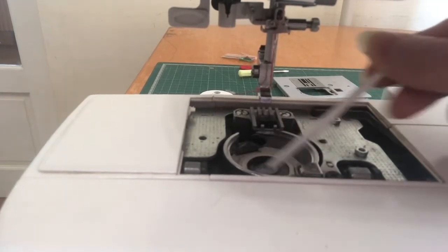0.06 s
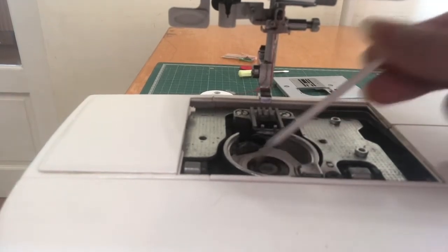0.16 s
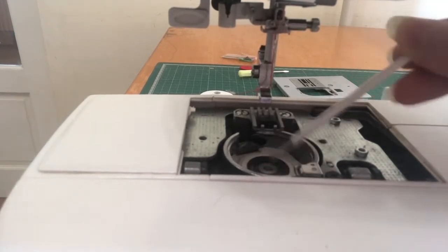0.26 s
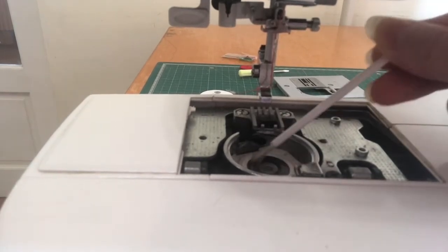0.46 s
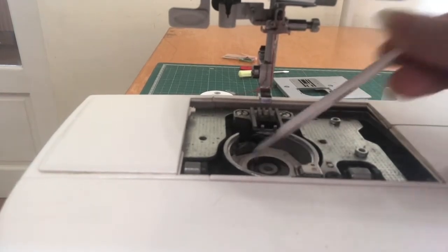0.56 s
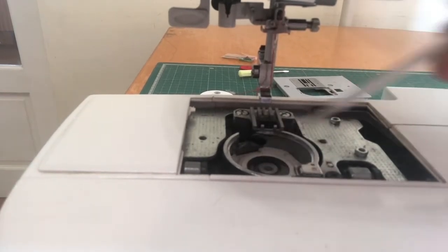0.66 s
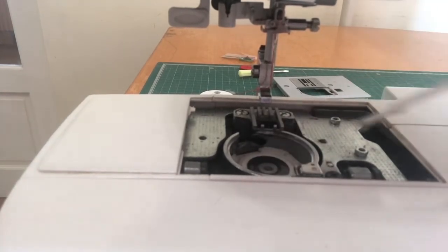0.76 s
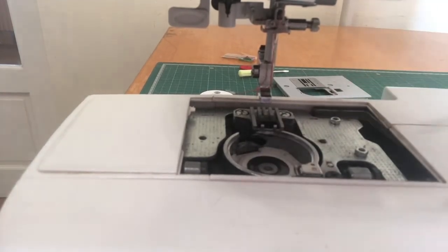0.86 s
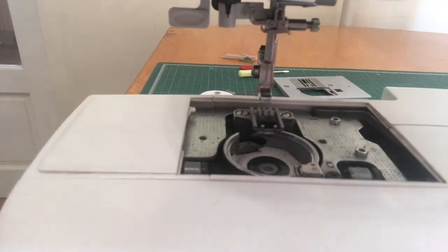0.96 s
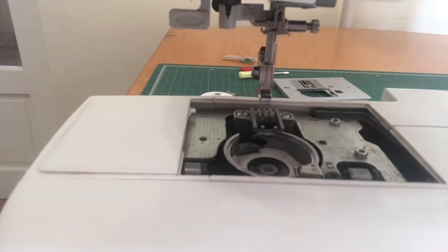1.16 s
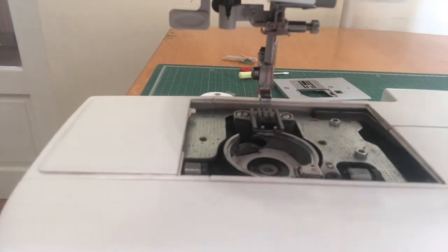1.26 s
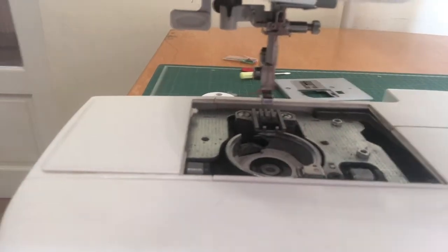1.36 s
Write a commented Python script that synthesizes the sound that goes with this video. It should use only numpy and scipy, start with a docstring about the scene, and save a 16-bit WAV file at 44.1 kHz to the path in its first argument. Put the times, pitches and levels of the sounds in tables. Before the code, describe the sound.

A stiff nylon brush scratches and flicks over metal inside a sewing machine, close by, with a low hollow rumble from the casing. At about 0.2 seconds the handle taps plastic and immediately hits metal harder, with a brief ring and hollow knock. Lighter scratching continues until 0.6 seconds. A few faint ticks follow until about 1.2 seconds over quiet room hiss.

```python
"""Brushing out a sewing machine

A stiff nylon brush works inside the open bed of a sewing machine in a quiet room, close to a phone.
Bristles drag and flick over the metal hook; the handle taps the plastic bobbin holder, then hits
the hook hard, and the hollow casing booms a little late. The brush leaves, with a few faint ticks
over the room hiss."""
import sys
import numpy as np
from scipy import signal
from scipy.fft import rfft, irfft
from scipy.io import wavfile

SR = 44100
rng = np.random.default_rng(int(sys.argv[2]) if len(sys.argv) > 2 else 0)


def inscribe(sig):
    """Save sig as 16-bit PCM at rate SR to the path in sys.argv[1].

    A 1-D sig is mono; a 2-D sig holds one channel per row.
    Samples are clipped to [-1, 1] before scaling.
    """
    pcm = np.round(np.clip(np.atleast_2d(sig).T, -1, 1) * 32767)
    wavfile.write(sys.argv[1], SR, pcm.astype(np.int16))


N = 61739


def undb(db):
    """Turn decibels into a number to multiply by."""
    return 10 ** (np.asarray(db) / 20)


def unit(x):
    """Scale a sound so that its average strength (rms) is 1."""
    return x / np.sqrt(np.mean(x ** 2))


def fade(t, fade_s):
    """Zero before t = 0, then a fade. A fade time is how long a drop of 60 dB takes."""
    return (t >= 0) * np.exp(-np.log(1000) * np.maximum(t, 0) / fade_s)


def click(at):
    """One sharp push at the given second."""
    return (np.arange(N) == int(at * SR)) * 1.


def band(x, hz, width):
    """Keep mostly the part of a sound around one pitch; the width is in Hz too."""
    return signal.lfilter(*signal.iirpeak(min(hz, .4 * SR), max(hz / width, .3), fs=SR), x)


def colour(x, points):
    """Make some pitches of a noise louder than others, along a curve of (Hz, dB) points."""
    hz, db = np.array(points).T
    freqs = np.arange(N // 2 + 1) * SR / N + 1
    curve_db = np.interp(np.log(freqs), np.log(hz), db)
    return irfft(rfft(x) * undb(curve_db), N)


def struck(tones, rise_cycles=4.3):
    """A small part after one click: each of its tones swells quickly, then fades."""
    t = np.arange(SR // 2) / SR
    out = 0
    for k, (hz, db, fade_s) in enumerate(tones):
        swell = np.clip(t * hz / rise_cycles, 0, 1)
        out += (-1) ** k * undb(db) * np.sin(2 * np.pi * hz * t) * swell * fade(t, fade_s)
    return out


def ring(force, response):
    """Every push in the force starts the response anew; plain noise comes out equally strong."""
    return signal.fftconvolve(force, response / np.sqrt(np.sum(response ** 2)))[:N]


def bristles(per_s, scatter_db, hardest_db=15):
    """Single bristles slip at random moments, some harder than the rest."""
    chance, direction, strength = rng.random((3, N))
    slips = chance < per_s / SR
    db = np.minimum(-scatter_db * np.log(1 - strength), hardest_db)
    return unit(slips * np.sign(direction - .5) * undb(db))


# The tone of the quiet room: (pitch [Hz], relative level [dB])
HISS_CURVE = [(15, -42), (25, -28.5), (60, -3), (142, 0), (238, -2.5), (304, -5.5), (651, -8.5),
              (1250, -13), (2900, -18.5), (4480, -17), (9580, -22.5), (15200, -26.5), (16500, -33.5)]


def room_hiss(level_db=-66.5):
    """A faint, steady hiss, strongest in the bass."""
    return undb(level_db) * unit(colour(rng.standard_normal(N), HISS_CURVE))


# The low tones of the hollow casing: (pitch [Hz], relative level [dB], fade time [s])
CASING_TONES = [(285, -21, 0.21), (366, 2, 0.071), (468, 4, 0.063), (583.6, -8.5, 0.11), (688.6, 2.5, 0.02),
                (771.5, -5.5, 0.047), (896, -22.5, 0.027), (1089, -23.5, 0.025)]


def casing(lag_cycles=0, fade_stretch=1, rise_cycles=2.5):
    """The casing after one push, one row per tone: each waits for its lag, swells and fades."""
    t = np.arange(SR // 2) / SR
    hz, db, fade_s = np.array(CASING_TONES).T[:, :, None]
    age = t - lag_cycles / hz
    swell = np.sin(np.pi / 2 * np.clip(age * hz / rise_cycles, 0, 1)) ** 2
    return undb(db) * swell * np.sin(2 * np.pi * hz * age) * fade(age, fade_s * fade_stretch)


# The tones of the metal hook: (pitch [Hz], relative level [dB], fade time [s])
HOOK_TONES = [(2273, -0.5, 0.024), (2633, -15, 0.055), (3028, -23, 0.079), (3470, -17.5, 0.081),
              (3832, -0.5, 0.052), (3805, -22.5, 0.28), (3882, -24, 0.34), (4390, -12.5, .035),
              (5560, -25, 0.027), (6000, 0, 0.019), (6310, -32, 0.23), (6340, -28.5, 0.29), (7294, -5, .04),
              (8130, -17, 0.05), (10020, 1.5, 0.028), (10430, -40, 0.14), (12300, -19, .025),
              (15000, -43, .2), (14960, -41, 0.213)]
# The tone of scratching nylon: (pitch [Hz], relative level [dB])
SCRATCH_CURVE = [(1200, 5.5), (2200, 13), (4000, 7), (6500, 9), (9000, -9), (12000, 0.5), (16000, -11)]
# How the dragging changes: (time [s], scratch level [dB], rumble level [dB],
# pitch the slipping locks on [Hz], lead of that pitch over distant tones [dB])
DRAG_PATH = [(0, -101, -79.5, 404, 1), (.047, -83, -75.5, 468, 0), (.057, -67.5, -55.5, 482, 12.5),
             (.08, -62.5, -50.5, 478, 15.5), (.105, -64, -50, 490, 20.5), (.115, -57.5, -50.5, 468, 7),
             (.13, -63.5, -55, 315, 12), (.163, -66, -52, 285, 13.5), (0.181, -83, -69, 285, 12),
             (0.216, -67, -70.5, 285, -1.5), (0.259, -47.5, -42.5, 366, 0.5), (.3, -58, -52, 366, 14.5),
             (.32, -54, -46.5, 366, 9.5), (.34, -61, -60, 366, 2), (.37, -65, -61, 366, 6.5),
             (.42, -64.5, -64, 366, 5.5), (.465, -68.5, -59, 285, 14.5), (.5, -72, -73.5, 468, 1.5),
             (0.533, -62.5, -57, 468, 11), (.545, -71, -62, 285, 6.5), (.568, -77, -56, 285, 15),
             (.59, -94, -72.5, 285, 5), (.69, -74, -80.5, 304, 3.5), (.73, -96, -78.5, 310, 3)]


def bristle_drag(t):
    """Pressed bristles scratch, ring the hook and rumble the casing, favouring one of its tones."""
    times, *columns = np.array(DRAG_PATH).T
    scratch_db, rumble_db, lock_hz, lead_db = (np.interp(t, times, column) for column in columns)
    slips = bristles(per_s=6000, scatter_db=2)
    scratch = undb(scratch_db) * unit(colour(slips, SCRATCH_CURVE))
    hook = undb(-19) * ring(undb(scratch_db) * slips, struck(HOOK_TONES))
    rumble = 0
    for (hz, _, _), tone in zip(CASING_TONES, casing(fade_stretch=1.5)):
        hum = ring(rng.standard_normal(N), tone)
        loudness = np.abs(signal.hilbert(hum))
        steady_hum = unit(hum / (loudness + .097) ** .75)  # even out most of the wobble
        off_pitch_db = np.minimum(60 * np.abs(np.log2(hz / lock_hz)), lead_db)
        dulling_db = 16 * max(np.log2(hz / 700), 0)  # tones above 700 Hz are weaker
        rumble += undb(rumble_db - off_pitch_db - dulling_db) * steady_hum
    return scratch + hook + rumble


# The tones of the plastic bobbin holder: (pitch [Hz], relative level [dB], fade time [s])
HOLDER_TONES = [(1324, -7.5, 0.07), (1664, -4.5, 0.042), (1952, -15.5, 0.16), (2260, -7.5, 0.077),
                (2533, -22, 0.062), (2820, -30, 0.021), (3650, -4, 0.036), (3960, -15, 0.06),
                (4890, 6, 0.013), (5610, -1.5, .03), (6550, -9.5, .025), (7730, -8, 0.046)]
# The tones of the brush's shaft: (pitch [Hz], relative level [dB], fade time [s])
SHAFT_TONES = [(2170, -7.5, 0.11), (2306, -10.5, 0.027), (2660, -9.5, 0.035)]
# Tufts snapping free: (time [s], length [s], push level [dB], centre pitch [Hz], shaft knock [dB])
TUFT_FLICKS = [(0.046, 0.0019, -60.5, 6000, -83), (0.084, 0.0039, -56, 6000, -82),
               (0.111, 0.002, -49, 9000, -41), (0.12, 0.0014, -47.5, 7800, -50),
               (0.126, .003, -53, 8000, -49.5), (0.145, .002, -65, 6000, -59),
               (0.147, .002, -59, 7000, -67), (0.154, .0015, -70, 11100, -75),
               (0.171, .002, -60, 7950, -68), (0.379, 0.0017, -61, 11000, -58),
               (0.387, 0.0023, -56, 10000, -72), (0.395, 0.0026, -55.5, 11000, -74),
               (0.4, 0.0014, -58, 10000, -100), (0.422, 0.0018, -61, 11000, -80),
               (0.429, .002, -59, 13000, -80), (0.453, 0.0063, -55.5, 9000, -85),
               (0.465, 0.0046, -55.5, 9000, -71), (.480, 0.015, -54.5, 7900, -85),
               (0.556, 0.0075, -60.5, 7700, -89)]


def bristle_flicks(t, rise_s=.001, tail_s=.0019):
    """Tufts of bristles snap free in short bursts and ring the holder, the hook and the shaft."""
    slips = bristles(per_s=12000, scatter_db=3.5)
    snaps, force, knocks = np.zeros((3, N))
    for at, length, db, hz, knock_db in TUFT_FLICKS:
        rise = np.clip((t - at) / rise_s, 0, 1)
        tail = np.exp(-np.maximum(t - at - length, 0) / tail_s)
        burst = undb(db) * slips * rise * tail
        snaps += band(burst, hz, width=1.34 * hz)
        force += burst
        knocks += undb(knock_db) * click(at)
    holder = undb(-9) * ring(force, struck(HOLDER_TONES))
    hook = undb(-28) * ring(force, struck(HOOK_TONES))
    shaft = signal.fftconvolve(knocks, struck(SHAFT_TONES))[:N]
    return snaps + holder + hook + shaft


# The handle's taps, first on the holder, then on the hook: (time [s], ring gain [dB], crack gain [dB],
# crack pitch [Hz], crack fade time [s], boom gain [dB], boom pitch [Hz],
# drop of the boom away from that pitch [dB per octave])
HANDLE_TAPS = [(0.2195, -29.5, -31, 3170, 0.041, -22.5, 746, 32.5),
               (.2443, -21.5, -18, 7500, 0.019, -23.5, 480, -2)]


def handle_tap(t, tap, tones, rattle_db=5, rattle_per_s=170, rattle_rise_s=.035):
    """A sharp crack, a late boom from the casing and the wavering ring of the part that is hit."""
    at, ring_db, crack_db, crack_hz, crack_fade_s, boom_db, boom_hz, drop_db = tap
    hit = click(at)
    crack = undb(12.5) * hit + rng.standard_normal(N) * fade(t - at, crack_fade_s)
    for _ in range(2):  # filter twice for steeper edges
        crack = band(crack, crack_hz, width=2 * crack_hz)
    octaves_away = np.abs(np.log2(np.array(CASING_TONES)[:, 0] / boom_hz))
    tone_gains = undb(boom_db - drop_db * octaves_away)
    boom = signal.fftconvolve(hit, tone_gains @ casing(lag_cycles=3.49))[:N]
    # loose parts rattle, so the level of each tone wavers
    rattle_times = np.arange(0, N / SR, 1 / rattle_per_s)
    depth_db = rattle_db * np.clip((t - at) / rattle_rise_s, 0, 1)
    ringing = 0
    for k, tone in enumerate(tones):
        waver = np.interp(t - at, rattle_times, np.tanh(rng.standard_normal(len(rattle_times))))
        note = signal.fftconvolve(hit, struck([tone]))[:N]
        ringing += (-1) ** k * undb(ring_db + depth_db * waver) * note
    return undb(crack_db) * crack + boom + ringing


# Ticks as the brush leaves: (time [s], starting level [dB], centre pitch [Hz])
FAINT_TICKS = [(0.6389, -57, 1930), (0.6404, -61, 10000), (.7578, -61, 4800), (0.8208, -64, 7500),
               (1.1057, -55.5, 2050), (1.202, -65, 600)]


def faint_ticks(t, fade_s=.0097):
    """Each tick is a tiny puff of noise that dies at once."""
    noise = rng.standard_normal(N)
    return sum(undb(db) * unit(band(noise, hz, width=.7 * hz)) * fade(t - at, fade_s)
               for at, db, hz in FAINT_TICKS)


def room_echo(sound, level_db=-24, fade_s=.54, delay_s=.004):
    """The room adds a short, dull tail to every sound."""
    t = np.arange(SR // 2) / SR
    tail = band(rng.standard_normal(len(t)), hz=3500, width=7000) * fade(t - delay_s, fade_s)
    return undb(level_db) * ring(sound, tail)


def scene():
    """The brush at work in the machine, with the room's hiss and echo, in one channel."""
    t = np.arange(N) / SR
    brushing = bristle_drag(t) + bristle_flicks(t)
    taps = handle_tap(t, HANDLE_TAPS[0], HOLDER_TONES) + handle_tap(t, HANDLE_TAPS[1], HOOK_TONES)
    near = brushing + taps + faint_ticks(t)
    return (room_hiss() + near + room_echo(near))[None]


def record(dry):
    """The phone cuts off the highest treble."""
    top_hz = 16000
    return signal.sosfilt(signal.ellip(8, .2, 70, top_hz, fs=SR, output="sos"), dry)


dry = scene()
out = record(dry)
inscribe(out)
```